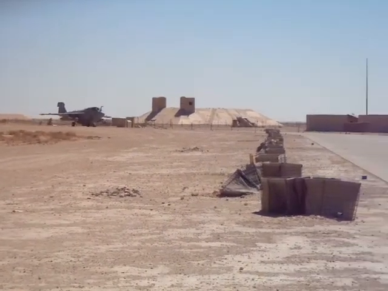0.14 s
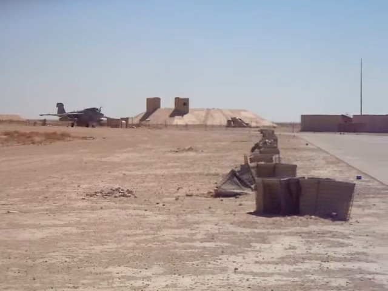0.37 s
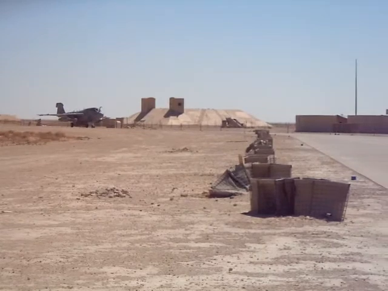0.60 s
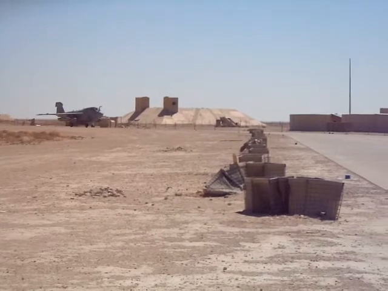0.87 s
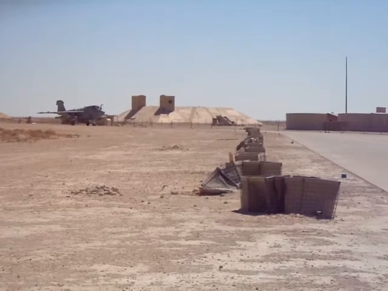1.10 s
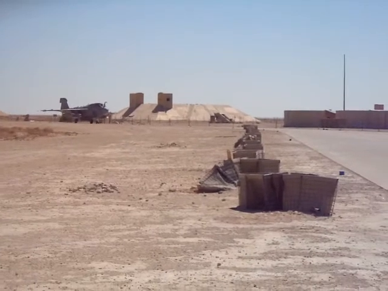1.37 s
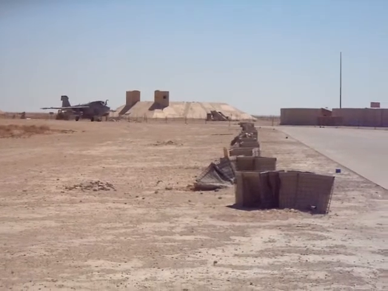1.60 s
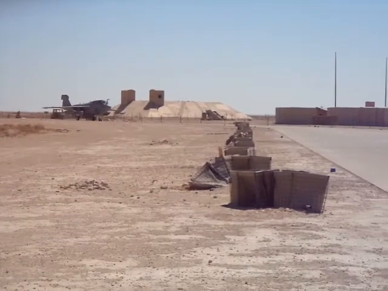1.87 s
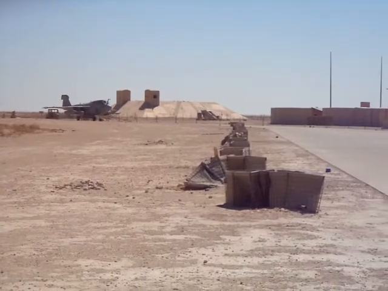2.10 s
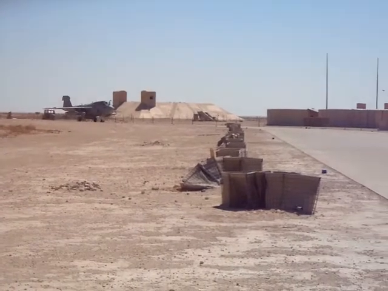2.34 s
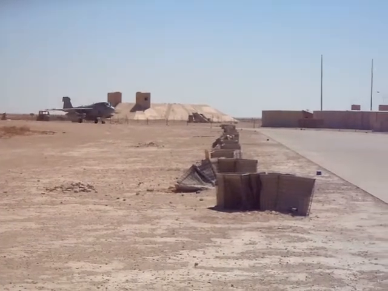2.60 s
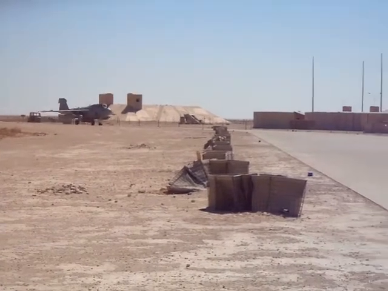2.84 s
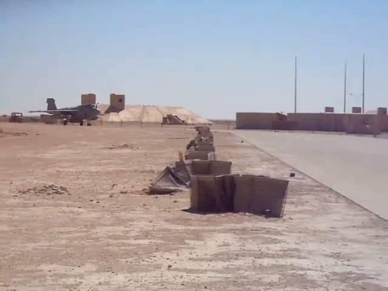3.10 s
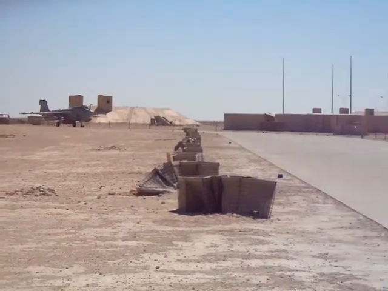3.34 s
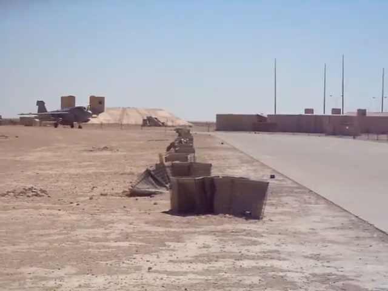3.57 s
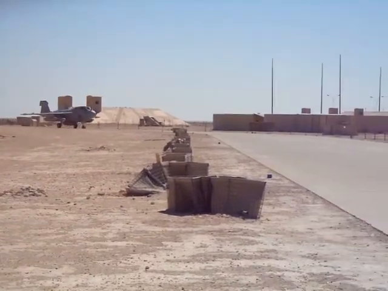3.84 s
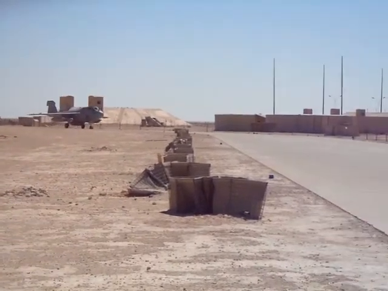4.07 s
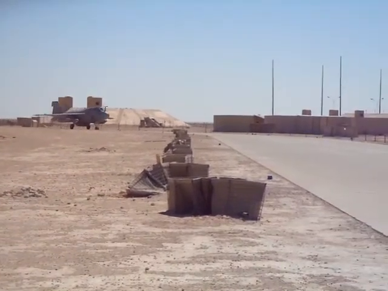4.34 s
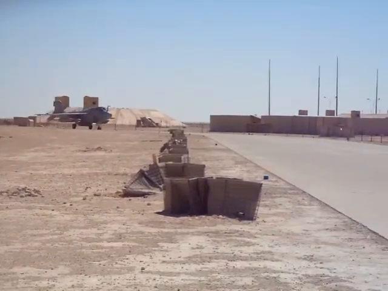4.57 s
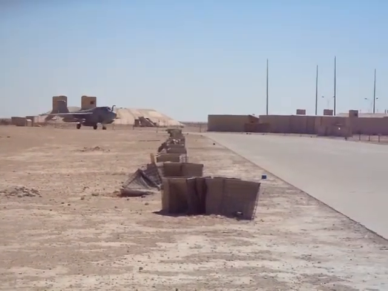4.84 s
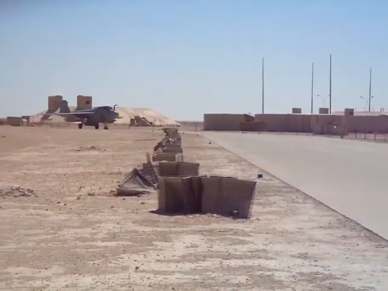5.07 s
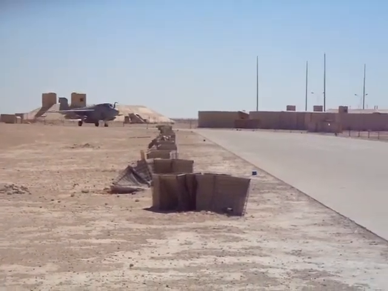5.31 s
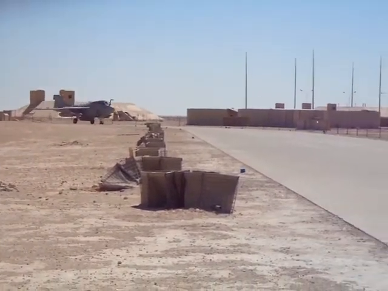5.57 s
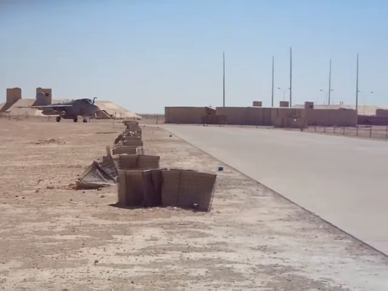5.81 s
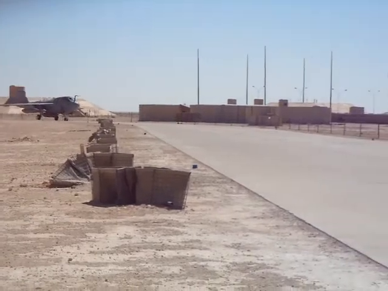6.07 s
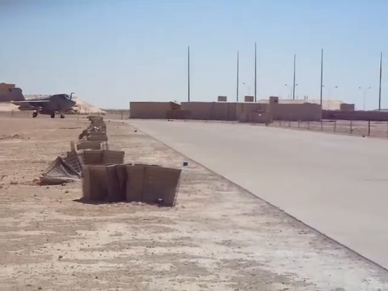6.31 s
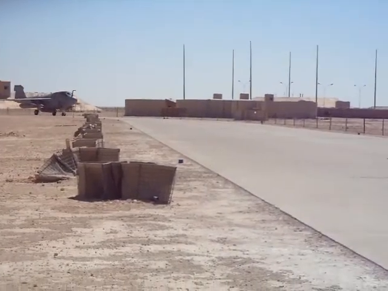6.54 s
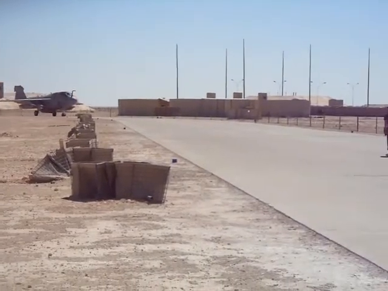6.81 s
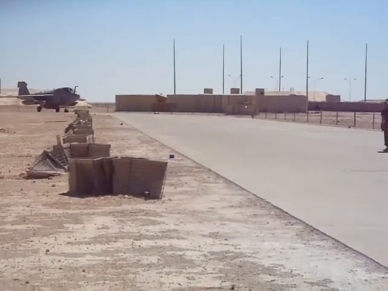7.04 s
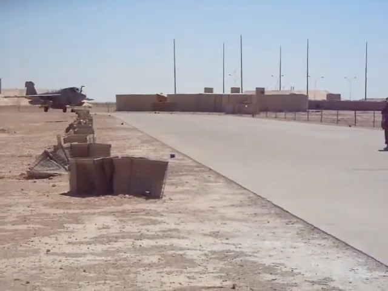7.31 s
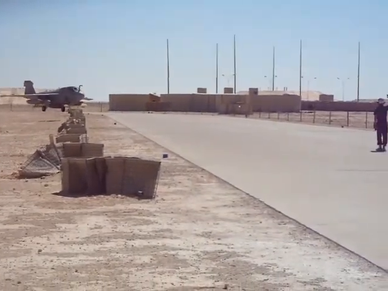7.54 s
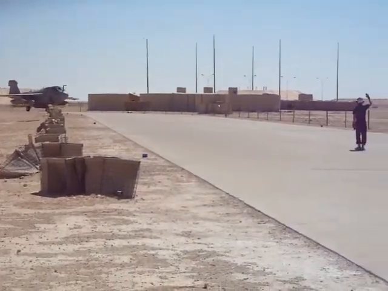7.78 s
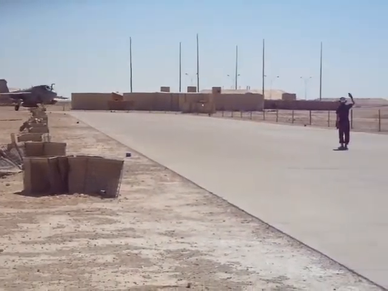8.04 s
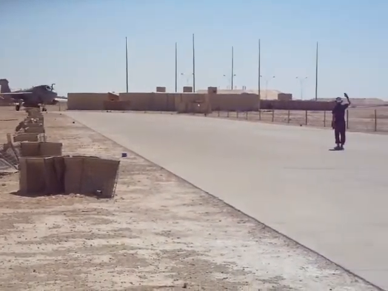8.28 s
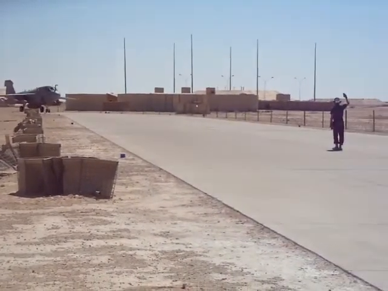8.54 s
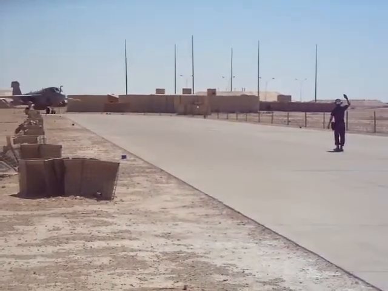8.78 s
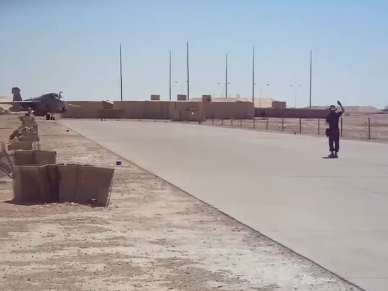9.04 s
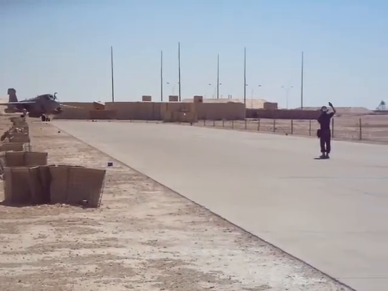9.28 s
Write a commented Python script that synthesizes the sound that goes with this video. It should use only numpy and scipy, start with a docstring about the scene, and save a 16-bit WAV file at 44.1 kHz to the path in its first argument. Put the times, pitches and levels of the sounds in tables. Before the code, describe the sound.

Gusty wind thumps and flutters heavily on a small camera microphone while a taxiing jet's shrill steady turbine whine and airy roar gradually grow louder.

```python
"""Open ground in gusty wind: a jet taxis closer, heard by the two microphone ports of a small camera.
Blade rows whine as harmonics of a shaft over filtered-noise roar; stirred air modulates both.
Advected eddy patterns rumble and flutter at the ports, and short noise bursts make the puffs.
The camera adds a thin sine whine and ticks made from band-limited impulses."""
import sys
import numpy as np
from scipy import signal
from scipy.fft import rfft, irfft, next_fast_len
from scipy.io import wavfile
from scipy.ndimage import uniform_filter1d, map_coordinates

SR = 44100
rng = np.random.default_rng(int(sys.argv[2]) if len(sys.argv) > 2 else 0)


def how_loud(loudness_db):
    """Turn decibels into a plain amplitude multiplier (0 dB gives 1, 20 dB gives 10)."""
    steps = np.asarray(loudness_db, float) / 20
    return 10 ** steps


def put_to_file(sound):
    """Save the sound as 16-bit audio at rate SR, in the file named by the first command-line argument."""
    columns = np.atleast_2d(sound).T  # one column per channel
    safe = np.clip(columns, -1, 1)
    whole_steps = np.round(safe * 32767)
    wavfile.write(sys.argv[1], SR, whole_steps.astype(np.int16))


N = 414540  # samples

# fast shaft rotation as heard: start_s, rotation_hz
SHAFT = [(0, 130.15), (.73, 129.55), (1.4, 129.35), (1.8, 129.25), (2.2, 129.33), (2.8, 129.6),
         (3.9, 130.05), (4.3, 130.25), (5, 130.75), (5.5, 130.88), (6, 130.88), (6.44, 130.55),
         (6.8, 130.15), (7.2, 129.83), (7.9, 129.53), (8.5, 129.37), (8.85, 129.38), (9.4, 129.65)]
# jet noise arriving through the air, before fixed gains: start_s, roar_db, treble_over_roar_db
JET = [(0.0, -64.5, -11), (0.39, -56.5, -14), (1.33, -63.5, -9), (1.67, -57.5, -1.5), (2.02, -64, -14.5),
       (2.22, -68, -6), (2.7, -61, -12.5), (2.88, -62.5, -12), (3.24, -63, -10), (3.74, -65, -12.5),
       (4.37, -58.5, -10), (4.66, -62.5, -10.5), (5.18, -56.5, -9.5), (6.2, -56, -12.5), (6.44, -50.5, -12),
       (6.88, -53.5, -7), (7.33, -53.5, -13), (7.49, -55, -6.5), (7.83, -57, -10), (7.93, -62, -4),
       (8.38, -53.5, -5.5), (8.48, -50, -10.5), (8.77, -56.5, -8.5), (9.4, -48, -6)]
# blade rows, multiples of the shaft: order
BLADE_ORDERS = (22.5, 25, 26, 28, 36, 44, 52, 54, 60)
# the same rows, before a fixed trim: level_over_roar_db, slow_shaft_wobble_depth (factor)
BLADES = [(-5, 0.9), (4.5, 0.01), (8, 0), (3.5, 0.08), (2, 0.2), (-19, 0), (-9.5, 0.6), (-2.5, 0),
          (-28, .1)]
# strongest blade rows, multiples of the shaft: order
LEADING_ORDERS = (24, 18, 48)
# rough sideband skirt of each leading tone: share (factor)
LEADING_SKIRT = (0.2, 0.64, 0.28)
# spectrum of the roar: frequency_hz, density_db
ROAR_SPECTRUM = [(200, 1), (600, 6), (1200, 2.5), (1600, 2), (2350, 6.5), (2750, 5), (3200, 11), (3900, 0),
                 (4300, 0.5), (4650, 2.5), (5100, -5), (7000, -2.5), (7500, -7.5), (9500, -20.5),
                 (13000, -36.5)]
# stirred air focusing or scattering one tone: centre_s, half_width_s, change_db, tone_hz
FOCUS = [(.27, 0.36, -3, 3110), (.44, 0.057, 1, 3110), (1.25, 0.14, -7.5, 3110), (1.7, 0.11, 9.5, 3110),
         (4.3, .12, 4, 3110), (4.62, 0.064, -7, 3110), (4.98, 0.047, 11.5, 3110), (5.47, 0.12, 14, 3110),
         (6.4, 0.14, 6.5, 3110), (6.7, 0.21, 8.5, 3110), (7.1, 0.062, -8, 3110), (7.62, 0.13, -17, 3110),
         (8.14, 0.12, 5.5, 3110), (8.46, 0.059, 5, 3110), (9.25, 0.15, 10, 3110), (.44, 0.067, -8, 2335),
         (6.3, .2, 6, 2335), (1.7, 0.22, 7, 2335), (4.47, 0.099, 4, 2335), (7.1, 0.13, -8, 2335),
         (8.75, 0.15, -12, 2335), (.44, 0.058, -24, 6220), (5.9, .3, -14, 6220), (8.12, 0.14, 11.5, 6220),
         (8.95, 0.18, 3.5, 6220), (4.87, 0.099, 11, 4670), (8.5, 0.049, 3, 4670), (9.18, 0.15, 6, 4670),
         (5.5, 0.071, 13, 7000), (6.35, 0.18, 11, 7000), (7.45, .12, 10.5, 7000), (8.35, .12, 10, 7000),
         (6.7, 0.31, 8, 3630), (8.45, 0.14, 7, 3630), (3.45, 0.14, 8.5, 3370), (6.65, 0.41, 5.5, 3370),
         (8.25, .15, 15, 3240), (9.3, 0.065, 7, 3240)]
# crossovers between parts of the roar that swell apart: edge_hz
PATCH_EDGES_HZ = (1700, 2850, 3800)
# steady breeze: start_s, rumble_db
BREEZE = [(0.0, -31), (0.86, -18), (1.1, -23), (2.98, -27), (3.35, -33), (3.69, -21.5), (4.06, -29),
          (4.42, -20), (4.92, -28), (7.62, -24), (7.96, -35.5), (8.46, -34), (8.67, -19.5), (8.82, -33),
          (9.11, -36), (9.4, -25)]
# brief lulls of the breeze: centre_s, half_width_s, change_db
LULLS = [(1.302, 0.0241, -8), (1.74, 0.02915, -8), (2.06, 0.031, -12), (2.5, 0.04143, -6),
         (3.169, 0.02707, -14.5), (3.4, 0.01409, -7.5), (5.289, 0.019204, -8), (5.45, 0.02682, -8),
         (6.1, 0.03894, -6), (7.02, 0.02, -7), (7.36, 0.0433, -6), (7.58, 0.025, -9.5)]
# slow shoves of air on both ports: start_s, length_s, rumble_db
SHOVES = [(0.362, 0.19, -19), (0.55, 0.56, -18.5), (1.31, 0.32, -19), (1.759, 0.057, -13.5),
          (2.736, 0.074, -14.5), (3.04, 0.061, -24), (3.507, 0.28, -16), (3.872, 0.11, -24),
          (4.09, 0.051, -21), (4.217, 0.33, -19), (4.675, 0.047, -19.5), (4.862, 0.082, -19),
          (5.175, 0.11, -16), (5.506, 0.057, -18.5), (5.7, 0.43, -24), (6.287, 0.037, -18.5),
          (6.428, 0.043, -16.5), (6.741, 0.085, -19.5), (6.883, 0.068, -23), (7.068, 0.27, -22),
          (7.436, 0.14, -15.5), (7.633, 0.223, -26), (8.164, 0.039, -24.5), (8.487, 0.35, -19.5),
          (9.18, 0.035, -23)]
# gusts of fast eddies: start_s, length_s, level_db, share_above_split_db, left_minus_right_db
GUSTS = [(0.08, 0.21, -28, -17, -2), (0.351, 0.11, -21.5, -14, 8), (0.648, 0.079, -23, -22, 5),
         (0.821, 0.21, -18, -12, -3), (1.03, 0.24, -23, -13, 3), (1.335, 0.098, -21.5, -10, 0),
         (1.456, 0.059, -19, -7, -6), (1.549, .12, -22, -12, -6), (1.781, 0.059, -21, -9, 4),
         (1.856, 0.16, -20, -7, 8), (2.107, 0.088, -29, -19, 3.5), (2.292, 0.04, -30, -14, 6),
         (2.396, 0.065, -28, -13, 8), (2.537, 0.039, -30, -15, -2), (2.654, 0.28, -26, -17, 4),
         (2.949, 0.075, -25, -15, 8), (3.027, 0.046, -20, -9, -4), (3.102, 0.028, -21, -9, -2),
         (3.214, 0.041, -21, -11, -2), (3.33, .02, -23, -15, -2), (3.431, 0.14, -26, -15, 3),
         (3.601, 0.16, -27, -17, 1), (3.889, 0.051, -31.5, -17, 0), (4.132, 0.17, -31, -17, -6),
         (4.334, 0.12, -29, -22, -4), (4.51, 0.013, -24, -10, -9), (4.979, 0.056, -15, -6, 2),
         (5.063, 0.21, -28, -12, 1), (5.315, 0.096, -24, -9, 1.5), (5.5, 0.037, -17, -11, 2),
         (5.537, 0.041, -19, -4, 2), (5.598, .16, -23, -6, 8), (5.785, 0.16, -27.5, -10, -2),
         (5.965, 0.075, -23, -7, 7), (6.259, 0.075, -28, -14, 3.5), (6.406, 0.078, -20, -10, 4),
         (6.502, 0.038, -18, -5, 7), (6.782, 0.045, -30, -12, -4), (6.912, .11, -31.5, -15, -4),
         (7.118, 0.12, -25, -11, 1.5), (7.285, 0.046, -30, -11, -11.5), (7.495, 0.034, -20.5, -14, -1),
         (7.647, .14, -22, -6.5, 3), (7.898, 0.082, -31.5, -11.5, 7), (8.143, 0.15, -32, -15.5, -1),
         (8.516, 0.057, -17, -10.5, 1), (8.581, 0.23, -19, -7, 2), (9.152, 0.16, -30, -17.5, -2)]
# sudden puffs listed for each port, before the gains of their parts: centre_s, level_db
PUFFS = {"left": [(0.679, -22), (0.858, -18.5), (0.945, -23), (1.402, -20), (1.481, -19.5), (1.814, -14.5),
         (1.863, -18.5), (1.875, -14.5), (1.939, -17), (2.205, -27), (2.31, -22.5), (2.953, -21),
         (3.067, -16.5), (3.111, -16.5), (3.219, -35), (3.287, -22.5), (3.436, -25), (3.726, -22),
         (5.004, -24.5), (5.022, -25), (5.549, -16), (5.603, -20), (5.629, -21), (5.663, -19), (5.698, -20),
         (5.811, -19.5), (5.926, -20.5), (6.014, -14), (6.411, -20), (6.445, -18), (6.506, -10),
         (6.525, -10.5), (7.161, -21.5), (7.223, -18), (7.669, -14), (7.739, -18.5), (8.536, -9.5),
         (8.605, -11.5), (8.697, -20), (8.765, -17)], "right": [(0.865, -17.5), (0.935, -13.5),
         (1.101, -16), (1.368, -23), (1.466, -18), (1.601, -18.5), (1.795, -20.5), (1.908, -20.5),
         (4.523, -23.0), (4.983, -27), (5.534, -19.5), (5.968, -17.5), (6.026, -17.5), (7.144, -21.5),
         (7.228, -18.5), (7.512, -18), (7.672, -20), (7.754, -17), (8.539, -18), (8.597, -18), (8.641, -22),
         (8.696, -20)]}
# dull body and bright core of a puff: half_width_s, gain_db, brightness_hz, follow (dB per dB of puff)
PUFF_PARTS = [(0.0048, -0.5, 368, 1), (0.0016, 6, 588, 1.35)]
# camera whine, before the gain of each port: start_s, level_db
CAMERA = [(0.0, -70), (0.5, -64.5), (1.1, -71), (1.94, -75.5), (4.4, -71), (5.71, -79), (7.43, -76),
          (7.88, -81), (8.43, -71), (8.93, -75), (9.4, -68)]
# camera ticks: start_s, peak_db, left_minus_right_db, lower_edge_hz, upper_edge_hz
TICKS = [(0.454, -34, 12.5, 1990, 14000), (0.906, -36.5, -10.5, 4030, 14140),
         (1.881, -46.5, 1.5, 6000, 12960), (2.781, -42.5, -7, 5034, 12400), (4.5112, -25.5, 3, 300, 2000),
         (4.511, -30.5, -2, 3052, 13500), (6.283, -48.5, 16.5, 7957, 13160), (6.517, -42, 4.5, 5020, 11800),
         (6.765, -36.5, 7.5, 8743, 11700), (7.538, -48.5, 5, 5960, 13000), (8.53, -34, 5.5, 4996, 12400),
         (9.057, -35, 5.5, 6530, 13550), (9.3346, -41, 3.5, 8500, 11830), (9.334, -16, 7, 1130, 3980)]

SLOW_SHAFT = .3  # turns per turn of the fast shaft
# leading tones: level at a middling roar, and dB per dB of roar
LEADING_DB, LEADING_FOLLOW, MID_ROAR_DB = (-44.5, -49, -59), (0.88, 0.79, 1.2), -56.5
# higher tones fade faster; steady share of each leading tone
FADE_HZ_PER_ORDER, LEADING_STEADY = 0.17, (0.96, 0.93, 0.86)
GROUND_S, GROUND_SHARE = .00155, .35  # delay and strength of the ground reflection
EDDY_LOW_HZ, EDDY_SPLIT_HZ, EDDY_TOP_HZ = 110, 450, 1500  # range over which eddy brightness is reckoned
BREEZE_EDDY_DB, BREEZE_BRIGHT_DB = -12, -16  # its eddies against its rumble; their share above the split
SHOVE_RISE_DB_S, SHOVE_FALL_DB_S, SHOVE_SAG_DB_S = 249.5, 200, 4
GUST_RISE_DB_S, GUST_FALL_DB_S, GUST_SAG_DB_S = 800, 800, 5
PUFF_LEAK_DB = -16  # trace of a puff on the other port
CAMERA_HZ = 12856
OPPOSED = np.array([[1], [-1]])  # opposite signs on left and right


def curves(table):
    """Linear interpolation: each column of a table becomes one value a sample."""
    s, *columns = np.transpose(table)
    return [np.interp(np.arange(N) / SR, s, c) for c in columns]


def times_ms():
    """Control-rate sampling: times in seconds, one every ms."""
    return np.arange(0, N / SR + .001, .001)


def per_sample(v):
    """Linear interpolation from one value a ms to one a sample."""
    return np.interp(np.arange(N) / SR * 1000, np.arange(len(v)), v)


def bell(s, half_s):
    """Gaussian envelope about a moment, one value a ms."""
    return np.exp(-((times_ms() - s) / half_s) ** 2)


def sides(pan_db):
    """Level difference between ports: half of it to each, with opposite sign."""
    return np.array([pan_db, -pan_db]) / 2


def butter(x, order, hz, kind="low"):
    """Causal Butterworth filtering."""
    return signal.sosfilt(signal.butter(order, hz, kind, fs=SR, output="sos"), x)


def lowpass(x, order, hz):
    """Zero-phase low-pass filtering, forward and backward."""
    return signal.sosfiltfilt(signal.butter(order, hz, fs=SR, output="sos"), x)


def shaped(gain_at, channels):
    """Spectral shaping: white noise weighted by a gain at each Hz, then brought to unit power."""
    size = next_fast_len(N)
    gain = gain_at(np.fft.rfftfreq(size, 1 / SR) + 1e-3)
    x = irfft(rfft(rng.standard_normal((channels, size))) * gain, size)[:, :N]
    return x / x.std(axis=1, keepdims=True)


def walk(hz, channels):
    """Low-passed random modulation of unit spread, quick up to about hz."""
    step = 16  # samples between control values
    size = next_fast_len(N // step + 2)
    ratio = np.fft.rfftfreq(size, step / SR) / np.reshape(hz, (-1, 1))
    x = irfft(rfft(rng.standard_normal((channels, size))) / (1 + ratio ** 2), size)
    return np.array([np.interp(np.arange(N) / step, np.arange(size), v / v.std()) for v in x])


def jet(shaft_hz, roar_db, treble_db):
    """Superposition of blade tones and broadband roar, with a swaying wavefront between the ports."""
    turn = 2 * np.pi * np.cumsum(shaft_hz) / SR
    slow = SLOW_SHAFT * turn
    wobble = np.cos(slow) + 1.12 * np.cos(2 * slow + 1) + 0.17 * np.cos(4 * slow + 2)
    lift_db = treble_db + 7.5
    rows = blade_rows(turn, wobble, shaft_hz, roar_db, lift_db)
    leading = leading_tones(turn, wobble, shaft_hz, roar_db)
    tones = rows * how_loud(sides(.8))[:, None] + leading * how_loud(sides(-1.0))[:, None]
    # the sway shifts the tones' phase oppositely on the two ports
    sway = np.exp(1j * sides(0.3 * walk(4., channels=1)[0]))
    return (tones * sway).real + roar(roar_db, lift_db) * how_loud(sides(-.4))[:, None]


def blade_rows(turn, wobble, shaft_hz, roar_db, lift_db):
    """Harmonics of rotation, amplitude-modulated by the slow shaft and scattered by the air."""
    order = np.array(BLADE_ORDERS)[:, None]
    db, depth = (c[:, None] for c in np.transpose(BLADES))
    # the air passes treble unevenly: high tones follow the top of the roar
    tilt = np.clip((order - 30.5) / 32, 0, 1.5)
    level = how_loud(db - 0.5 + roar_db + tilt * lift_db + focus(order, shaft_hz))
    scatter = fading(len(BLADES), FADE_HZ_PER_ORDER * order, 0.8)
    # a rough skirt fades with its tone
    skirt = 1 + 0.39 * fading(len(BLADES), 110.0, 0)
    return (level * (1 + depth * wobble) * scatter * skirt * np.exp(1j * order * turn)).sum(0)


def leading_tones(turn, wobble, shaft_hz, roar_db):
    """Harmonics of rotation whose levels follow the roar, each at its own rate."""
    order, base_db, follow, steady, share = (
        np.array(v)[:, None]
        for v in (LEADING_ORDERS, LEADING_DB, LEADING_FOLLOW, LEADING_STEADY, LEADING_SKIRT))
    level = how_loud(base_db + follow * (roar_db - MID_ROAR_DB) + focus(order, shaft_hz))
    scatter = fading(len(order), FADE_HZ_PER_ORDER * order, steady)
    skirt = 1 + share * fading(len(order), 88.0, 0)
    return (level * (1 + 0.11 * wobble) * scatter * skirt * np.exp(1j * order * turn)).sum(0)


def focus(orders, shaft_hz):
    """Refraction: stirred air focuses or scatters each tone, so it swells or fades."""
    db = np.zeros((len(orders), len(times_ms())))
    for s, half_s, focus_db, hz in FOCUS:
        # a tone answers when its mean frequency is within 2 % of the listed one
        near = np.abs(np.ravel(orders) * shaft_hz.mean() / hz - 1) < .02
        db[near] += focus_db * bell(s, half_s)
    return np.array([per_sample(v) for v in db])


def fading(count, hz, steady):
    """Multipath scattering: a tone's size and phase wander about a steady share."""
    a = walk(np.resize(hz, 2 * count), channels=2 * count)
    spread = np.sqrt((1 - np.minimum(steady, 1) ** 2) / 2)
    return steady + spread * (a[:count] + 1j * a[count:])


def roar(roar_db, lift_db):
    """Broadband jet noise, comb-filtered by interference with its ground reflection."""
    hz, density_db = np.transpose(ROAR_SPECTRUM)

    def colour(f):
        """Interference of direct and reflected paths on the roar's spectrum."""
        ground = 1 + GROUND_SHARE * np.exp(-f / 2500 - 2j * np.pi * f * GROUND_S)
        spectrum = how_loud(np.interp(np.log(f), np.log(hz), density_db))
        return spectrum * np.abs(ground) * np.minimum(f / 150, 1) ** 2

    mid, side = shaped(colour, channels=2)
    # the ports hear the top of the roar less alike
    hiss = mid + (0.13 * side + 0.29 * butter(side, 2, 7000, "high")) * OPPOSED
    dull = lowpass(hiss, 2, 5200)
    cuts = [0] + [lowpass(dull, 3, f) for f in PATCH_EDGES_HZ] + [dull]
    # parts of the low and middle roar swell apart
    swell = how_loud(4.0 * walk(1.6, channels=4))
    patchy = sum((b - a) * w for a, b, w in zip(cuts, cuts[1:], swell))
    return how_loud(roar_db + 11.0) * (patchy + (hiss - dull) * how_loud(lift_db))


def wind():
    """Incoherent addition: breeze, shoves and gusts add in power, which weights brightness and side."""
    breeze_db = curves(BREEZE)[0] + per_sample(sum(db * bell(s, half_s) for s, half_s, db in LULLS))
    shove = swells(*np.transpose(SHOVES), SHOVE_RISE_DB_S, SHOVE_FALL_DB_S, SHOVE_SAG_DB_S)
    start, length, db, bright_db, pan_db = np.transpose(GUSTS)
    gust = swells(start, length, db, GUST_RISE_DB_S, GUST_FALL_DB_S, GUST_SAG_DB_S)
    calm = how_loud(breeze_db + BREEZE_EDDY_DB) ** 2
    total = calm + per_sample(gust.sum(0))
    high = calm * how_loud(BREEZE_BRIGHT_DB) ** 2 + per_sample(how_loud(bright_db) ** 2 @ gust)
    total_db, high_db = 10 * np.log10(total), 10 * np.log10(high)
    rumble_db = 10 * np.log10(how_loud(breeze_db) ** 2 + per_sample(shove.sum(0)))
    return rumble(rumble_db, total_db) + eddies(total_db, high_db, per_sample(pan_db @ gust) / total)


def swells(start, length, db, rise_db_s, fall_db_s, sag_db_s):
    """Exponential growth and decay: power of each event at every ms, climbing, sagging and falling."""
    t = times_ms() - start[:, None]
    over = t - length[:, None]
    lost_db = rise_db_s * np.maximum(-t, 0) + sag_db_s * np.maximum(t, 0) + fall_db_s * np.maximum(over, 0)
    return how_loud(db[:, None] - lost_db) ** 2


def rumble(db, eddy_db):
    """Turbulent pressure: large eddies push both ports nearly alike."""
    def spectrum(f):
        """Band of large-eddy pressure, rolling off at both ends."""
        rise = (f / 14) ** 2 / (1 + (f / 14) ** 2)
        return rise / (1 + (f / 30) ** 2) ** 0.5 / (1 + (f / 85) ** 4) ** .5

    both, apart = shaped(spectrum, channels=2)
    push = both + 0.52 * apart * OPPOSED
    deep = lowpass(push, 2, 45)
    # the upper part grows with the fast eddies
    upper = how_loud(0.29 * (uniform_filter1d(eddy_db - db, size=4000) + 6))
    level = how_loud(db + 4.1 * walk(23.3, channels=1) + sides(1.5)[:, None])
    return level * (deep + upper * (push - deep))


def eddies(db, high_db, pan_db):
    """Frozen turbulence: a pressure pattern swept past each port plays higher and harder in faster air."""
    def fall(k):
        """Decay of the pattern's spectrum with wavenumber."""
        return np.exp(-k / 2.5) / (1 + k ** 2) ** .7

    corners = np.geomspace(20, 800, num=40)  # Hz
    hz = np.arange(EDDY_LOW_HZ, EDDY_TOP_HZ)
    power = fall(hz / corners[:, None]) ** 2 / corners[:, None]
    share_db = 10 * np.log10(power[:, EDDY_SPLIT_HZ - EDDY_LOW_HZ:].sum(1) / power.sum(1))
    # the brighter the eddies, the faster the air; the windward port gets the quicker and louder stream
    corner = np.interp(1.2 * (high_db - db) - .6 + .6 * sides(pan_db), share_db, corners)
    heard_db = np.interp(corner, corners, 10 * np.log10(power.sum(1)))
    puff = 1.9 * np.tanh((.95 * walk(60., channels=2) + .55 * walk(16., channels=1)) / 1.6)
    grain = 1000  # Hz at which the pattern plays at its own rate
    speed = corner * np.exp(.42 * puff)
    # the grille slows the fastest air
    place = np.cumsum(speed / np.sqrt(1 + (speed / 620) ** 2) / grain, axis=1)
    pattern = shaped(lambda f: fall(f / grain), channels=2)
    swept = np.array([map_coordinates(p, [at], order=3, mode="wrap") for p, at in zip(pattern, place)])
    # between flaps the stream nearly stalls
    flap = how_loud(2.35 * puff - 2.0 * np.minimum(puff, 0) ** 2)
    swept = butter(swept * flap, 3, [80, 1800], "band")
    return swept * how_loud(db - 1.5 - heard_db + .5 * sides(pan_db))


def puffs():
    """Transient turbulence: Gaussian bursts of noise on one port, with a trace on the other."""
    kicks = np.zeros((2, N))
    for port, table in zip(kicks, PUFFS.values()):
        s, db = np.transpose(table)
        port[(s * SR).astype(int)] = how_loud(db)
    kicks = kicks + how_loud(PUFF_LEAK_DB) * kicks[::-1]
    t, out = np.arange(-SR // 40, SR // 40 + 1) / SR, 0
    for half_s, db, hz, follow in PUFF_PARTS:
        burst = signal.fftconvolve(kicks ** follow, [np.exp(-(t / half_s) ** 2)], "same")
        flutter = shaped(lambda f: np.minimum(f / hz, 1) ** 2 * np.exp(-f / hz), channels=2)
        # dividing by its running size evens the flutter out
        even = np.sqrt(uniform_filter1d(flutter ** 2, size=120) + 0.042)
        out = out + how_loud(db) * burst * flutter / even
    return out


def camera():
    """Sinusoidal whine, stronger and earlier in phase on the right, with impulsive ticks."""
    whine_db, = curves(CAMERA)
    level = how_loud(whine_db + 1.5 * walk(20., channels=1) + np.array([[0.5], [10.5]]))
    out = level * np.sin(2 * np.pi * CAMERA_HZ * np.arange(N) / SR + np.array([[0], [1.05]]))
    for s, db, pan_db, low_hz, top_hz in TICKS:
        tick = butter(signal.unit_impulse(128), 2, [low_hz, top_hz], "band")
        at = int(s * SR)
        out[:, at:at + 128] += how_loud(db + sides(pan_db))[:, None] * tick / np.abs(tick).max()
    return out


def scene():
    """Linear superposition of the jet, the wind on the ports and the camera."""
    (shaft_hz,), (roar_db, treble_db) = curves(SHAFT), curves(JET)
    return jet(shaft_hz, roar_db, treble_db) + wind() + puffs() + camera()


def band_limit(x):
    """A steep low-pass at the top of the band."""
    return signal.sosfilt(signal.butter(12, 14150, fs=SR, output="sos"), x)


def record(dry):
    """Soft saturation: the loudest peaks flatten near full scale."""
    flat = dry / (1 + (dry / .96) ** 8) ** (1 / 8)
    return band_limit(flat)


dry = scene()
out = record(dry)
put_to_file(out)
```